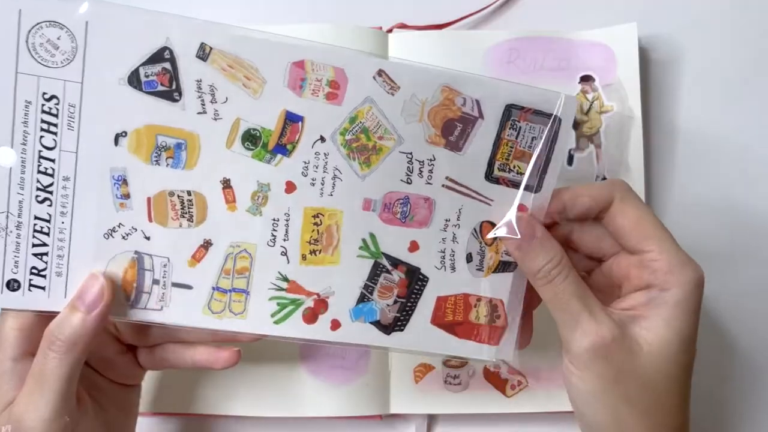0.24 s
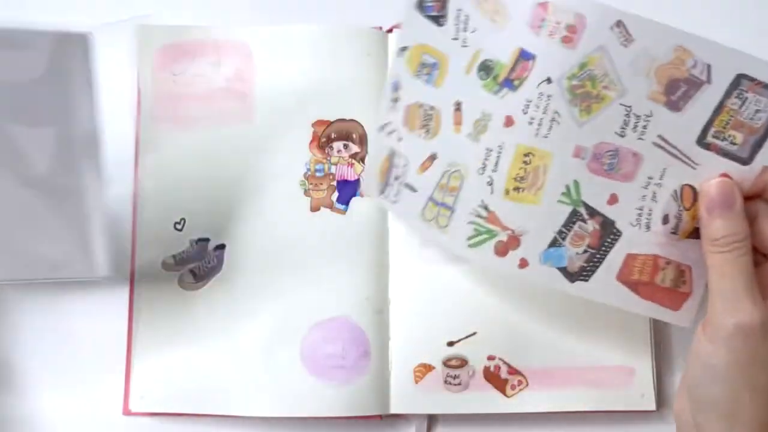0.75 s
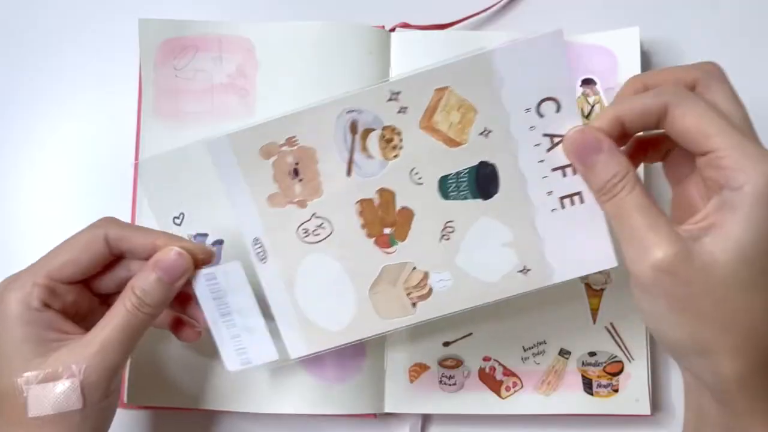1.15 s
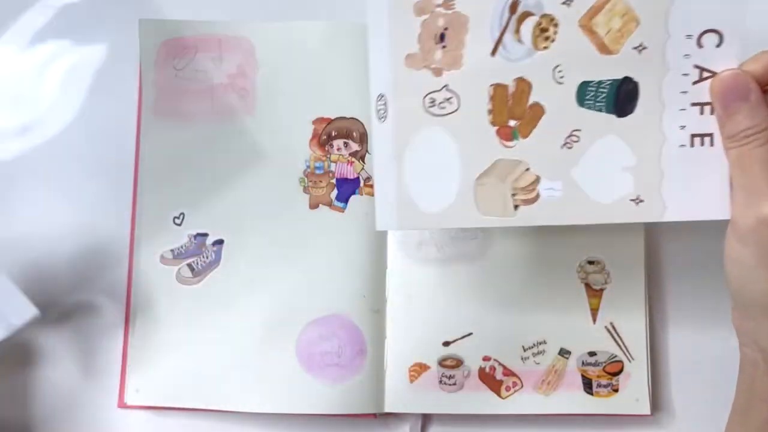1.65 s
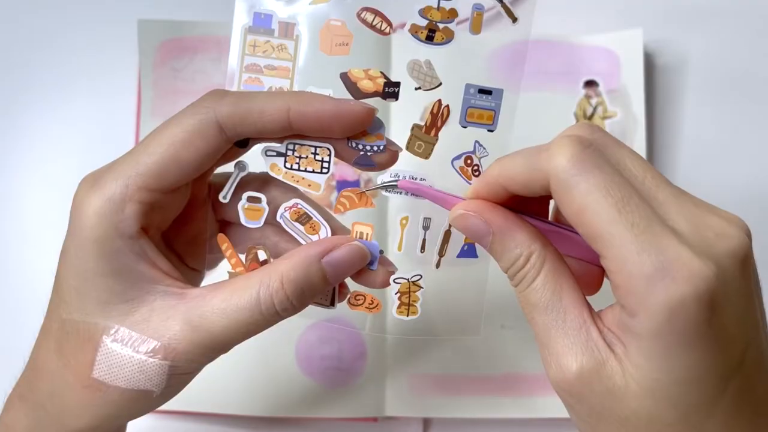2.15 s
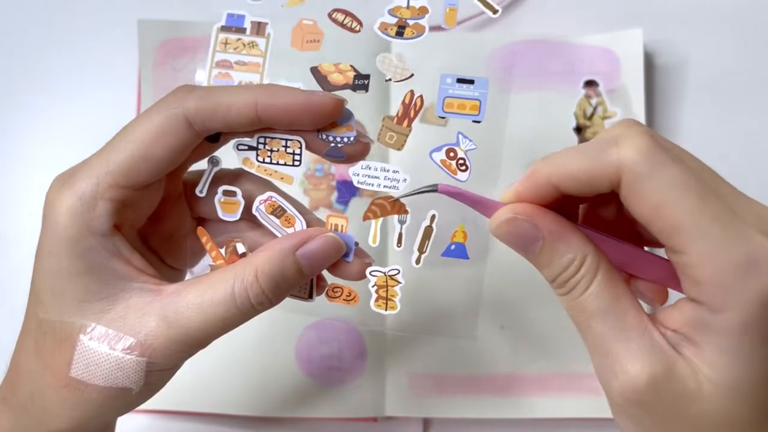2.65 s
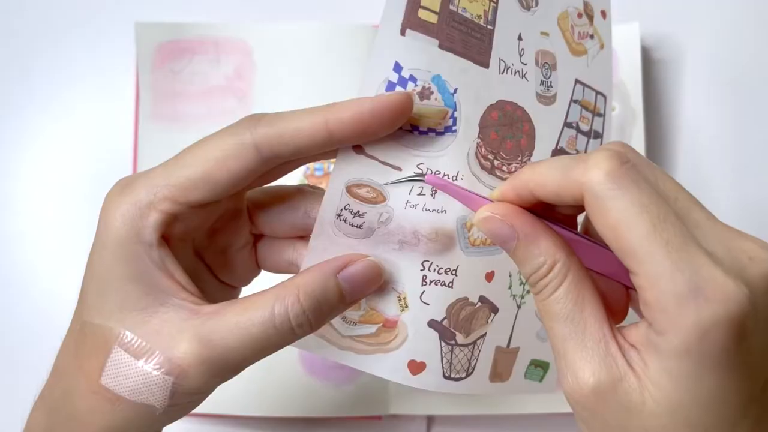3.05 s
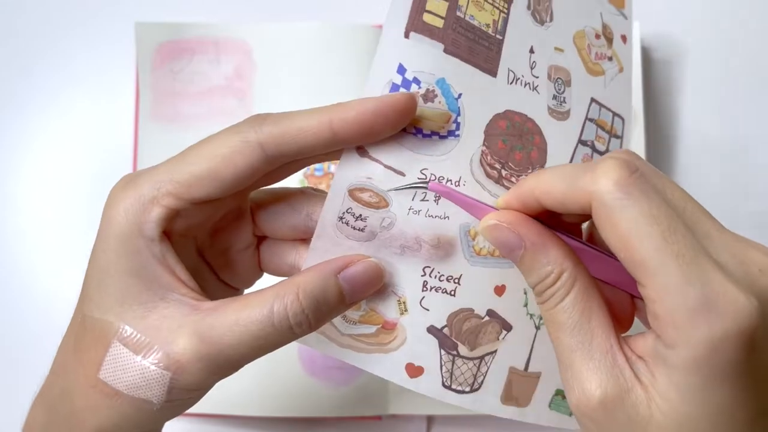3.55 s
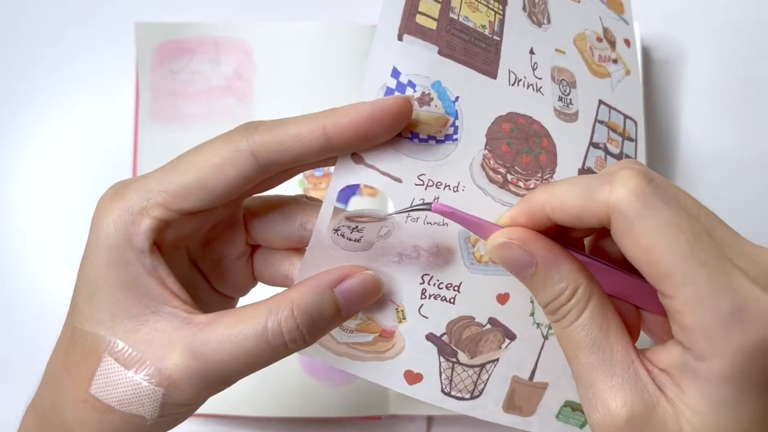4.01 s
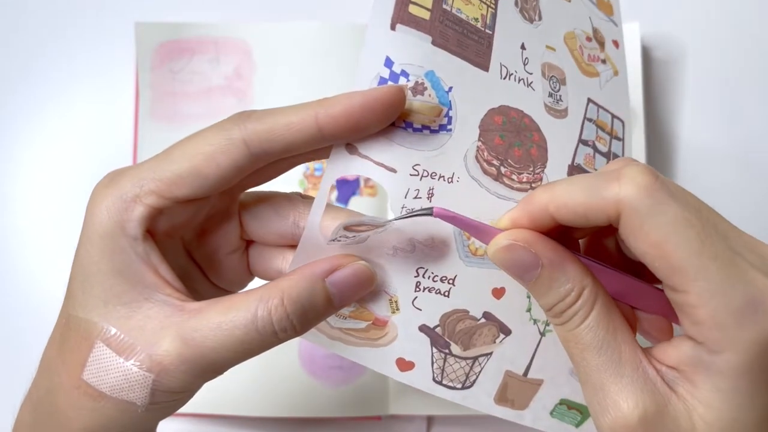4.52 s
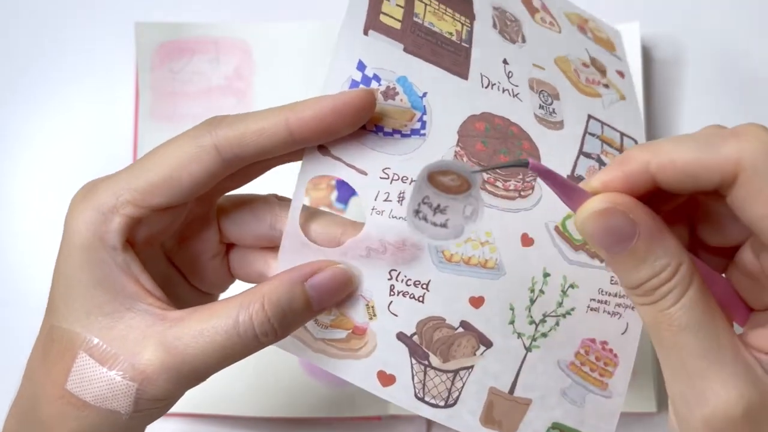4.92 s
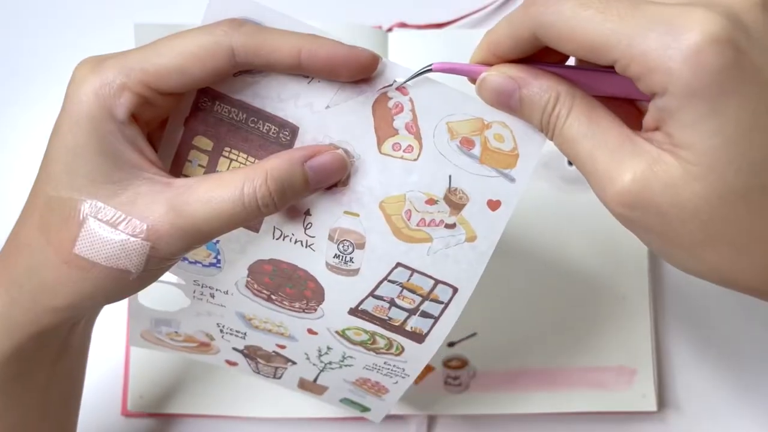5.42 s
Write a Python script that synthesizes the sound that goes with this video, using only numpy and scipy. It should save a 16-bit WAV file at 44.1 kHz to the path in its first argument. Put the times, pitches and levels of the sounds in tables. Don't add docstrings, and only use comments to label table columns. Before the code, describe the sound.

Close at a desk in a small room, thin plastic sleeves hiss and crackle as two printed sheets are pulled out in quick strokes. After about two seconds the handling becomes sparse: tweezers tug stickers from backing paper with isolated dry pops and faint peels. A low, wavering appliance hum runs beneath, shifting abruptly between takes. Close, bright stereo microphone with little room echo.

```python
import sys
import numpy as np
from scipy import signal
from scipy.fft import rfft, irfft
from scipy.io import wavfile
from scipy.ndimage import uniform_filter1d

SR = 44100
rng = np.random.default_rng(int(sys.argv[2]) if len(sys.argv) > 2 else 0)


def volts_from_decibels(level):
    exponent = np.asarray(level, float) / 20
    return 10 ** exponent


def waveform_to_disk(signal):
    frames = np.transpose(np.atleast_2d(signal))
    scaled = np.clip(frames, -1, 1) * 32767
    samples = np.round(scaled).astype(np.int16)
    wavfile.write(sys.argv[1], SR, samples)


N = 250047
TIME = np.arange(N) / SR
BINS_HZ = np.maximum(np.arange(N // 2 + 1) * SR / N, 1)


def rms_one(x):
    return x / np.sqrt(np.mean(x ** 2) + 1e-20)


def at_hz(points):
    hz, value = np.transpose(points)
    return np.interp(np.log(BINS_HZ), np.log(hz), value)


def colour(x, spectrum):
    return rms_one(irfft(rfft(x) * volts_from_decibels(at_hz(spectrum)), N))


def pair(mid, side, likeness):
    alike = np.clip(at_hz(likeness), 0, 1)
    m = rfft(mid, N) * np.sqrt(1 + alike)
    s = rfft(side, N) * np.sqrt(1 - alike)
    return irfft(np.array([m + s, m - s]), N) / np.sqrt(2)


def drift(rate_hz):
    r = np.exp(-2 * np.pi * rate_hz / SR)
    slow = signal.lfilter([1], [1, -2 * r, r * r], rng.standard_normal(N + SR))
    return rms_one(slow[SR:])


def resonate(x, modes, alternate=1):
    out = 0
    for k, (hz, width_hz, level_db) in enumerate(modes):
        r = np.exp(-np.pi * width_hz / SR)
        b = (1 - r * r) / 2 * np.array([1, 0, -1])
        a = [1, -2 * r * np.cos(2 * np.pi * hz / SR), r * r]
        sign = (-1) ** (k * alternate)
        out = out + volts_from_decibels(level_db) * sign * signal.lfilter(b, a, x)
    return out


def under(strokes):
    flap_db, flap_follows = -63, 0.51
    sparkle_db, sparkle_grows = -61, 1.4
    attack_s = 0.0091
    out = np.zeros((4, N))
    for start_s, end_s, first_db, last_db, body_rel_db in strokes:
        span = slice(round(start_s * SR), round(end_s * SR))
        hiss_db = np.interp(TIME[span], [start_s, end_s], [first_db, last_db])
        body_db = hiss_db + body_rel_db
        flap = flap_db + flap_follows * (body_db + 60)
        sparkle = sparkle_db + sparkle_grows * (hiss_db + 50)
        out[:, span] = volts_from_decibels(np.array([hiss_db, body_db, flap, sparkle]))
    keep = np.exp(-1 / (attack_s * SR))
    rising = signal.lfilter([2 * (1 - keep)], [1, -keep], out)
    return uniform_filter1d(np.minimum(out, rising), size=160)


# start_s, end_s, hiss_start_db, hiss_end_db, body_against_hiss_db
SLIDES = [(0.046, 0.12, -68.5, -55.5, -3.5), (0.12, 0.276, -55.5, -53.5, -3.5), (0.276, 0.34, -42, -43, -9),
          (0.34, 0.43, -43, -36.5, -13), (0.43, 0.53, -36, -39.5, -18), (0.53, 0.652, -38.5, -42.5, -14.5),
          (0.657, 0.762, -60, -74, -2.5), (0.767, 0.83, -58, -64.5, 3), (0.83, 0.912, -64.5, -59, 1),
          (0.914, 1.022, -72, -81.5, 6), (1.03, 1.089, -57.5, -46.5, -12.5),
          (1.089, 1.213, -44, -63.5, -14), (1.268, 1.472, -62, -50.5, -14),
          (1.472, 1.608, -51.5, -50.5, -8.5), (1.612, 1.7, -68.5, -83, -2), (1.73, 1.865, -60.5, -79, 3),
          (1.868, 1.879, -55.5, -60, 6.5), (1.879, 1.964, -41.5, -45.5, -15)]
# start_s, end_s, hiss_start_db, hiss_end_db, body_against_hiss_db
PEELS = [
    (2.36, 2.41, -81, -77, 5.5),
    (2.435, 2.444, -54.5, -64, 11.5),
    (3.556, 3.66, -62.5, -66, 1.5),
    (3.66, 3.755, -64.5, -64.5, 0.5),
    (3.755, 3.87, -74, -94.5, 5),
    (4.55, 4.572, -69, -71.5, -2),
    (4.98, 5.01, -68, -79.5, 9.5),
    (5.43, 5.53, -84, -85, 9),
    (5.53, 5.67, -86, -76.5, 9.5),
]
# start_s, length_s, flap_gain_db
LURCHES = [
    (0.219, 0.04, 9),
    (0.37, 0.044, 5.5),
    (0.583, 0.037, 10),
    (1.066, 0.03, 7),
    (1.55, 0.05, 3),
    (1.744, 0.037, 10.5),
    (3.654, 0.088, 7),
]
# frequency_hz, level_db (per Hz)
FILM_COLOUR = [(2500, -41.5), (4500, -7), (6300, -2.5), (8000, -3), (10000, -3), (12600, 6.5),
               (13800, -25.5), (16000, -34)]
SPARKLE_COLOUR = [(12000, -36.5), (13000, -2.5), (14000, -2.5), (15000, 9), (16500, -3.5)]
GLUE_COLOUR = [(2500, -42), (4500, -9), (6300, -1.5), (8300, -1.5), (10000, -8), (12000, -4), (13500, -31),
               (16000, -39.5)]
SHEET_COLOUR = [(900, -32.5), (1500, 2), (1950, -2.5), (2200, 0), (2480, -1.5), (3200, 2), (4500, -2.5),
                (7000, -26)]
FLAP_COLOUR = [(150, -14), (350, -3.5), (700, -6), (1200, -5.5), (2000, -51)]
# frequency_hz, likeness (0 to 1)
NEAR_LIKE = [(150, 0.92), (640, 0.33), (1400, 0.61), (3100, 0.65), (6000, 0.49), (8300, 1), (11000, 0.98),
             (16000, 0.97)]


def rubbing(grain_db=0.0, clump_db=-0.5, patch_db=1.5, ticks_per_s=140.0, tick_db=19.5, tick_spread_db=1.5):
    clumps = volts_from_decibels(clump_db * drift(110))
    grains = volts_from_decibels(grain_db * rng.exponential(1, (2, N)))
    catches = clumps * grains * rng.standard_normal((2, N))
    tick_level_db = tick_db + tick_spread_db * np.minimum(rng.exponential(1, N), 3)
    ticks = (rng.random(N) < ticks_per_s / SR) * volts_from_decibels(tick_level_db)
    both = pair(catches[0] + ticks, catches[1], NEAR_LIKE)

    film_hiss, film_body, film_flap, film_sparkle = under(SLIDES)
    glue_hiss, glue_body, glue_flap, _ = under(PEELS)
    hiss = film_hiss * colour(both, FILM_COLOUR) + glue_hiss * colour(both, GLUE_COLOUR)
    sheet = volts_from_decibels(2.5 * drift(25)) * colour(both, SHEET_COLOUR)
    body = film_body * (sheet + resonate(sheet, [(2130, 130, 1.3)]))
    body += glue_body * (sheet + resonate(sheet, [(2400, 91, 3)]))
    gust_db = 3.5 * drift(20)
    for start_s, length_s, gain_db in LURCHES:
        gust_db = gust_db + gain_db * np.exp(-((TIME - start_s) / length_s) ** 2)
    flap = (film_flap + glue_flap) * volts_from_decibels(gust_db) * colour(both, FLAP_COLOUR)
    sparkle = film_sparkle * colour(both, SPARKLE_COLOUR)
    return volts_from_decibels(patch_db * drift(30)) * hiss + body + flap + sparkle


# start_s, crack_peak_db, body_rel_db, thud_rel_db, pitch_hz
CREASES = [(0.0741, -17.5, -11.5, -30.5, 5700), (0.1199, -4, -22.5, -33.5, 5200),
           (0.156, -27, -7, -17, 6100), (0.2458, -43.5, -5.5, -9, 2070), (0.3535, -34, -3, -22, 2140),
           (0.3744, -29, -9, -16, 1200), (1.054, -42.5, -1, 1, 2170), (0.6, -24.5, -19, -18, 2180),
           (0.6213, -15, -24, -21, 2020), (0.6444, -29, -7, -21.5, 1190), (0.7161, -38.5, -12.5, -14, 2500),
           (0.7651, -25.5, -18, -20, 4250), (0.7853, -35, -6.5, 2.5, 1290),
           (0.8118, -13.5, -14.5, -34.5, 4920), (0.8657, -36, -6.5, -20, 5600),
           (0.9033, -47, 5.5, -19, 4920), (0.9414, -55.5, 7, 3, 3550), (1.0298, -28.5, -41, -36, 1270),
           (1.0677, -33, -5, -1.5, 1120), (1.0837, -26, -16, -15, 5960), (1.0984, -18, -14.5, -40, 5800),
           (1.6054, -42, -3, -6, 1210), (1.7071, -40.5, 4.5, -1.5, 2140), (1.714, -19.5, -21, -39, 2210)]
# start_s,
# crack_peak_db, body_rel_db, thud_rel_db, pitch_hz
POPS = [(2.3802, -45.5, -5, -13, 4270), (2.394, -49, 5, -9, 1920), (2.4316, -41, 8, 5.5, 2620),
        (2.4487, -14, -5.5, -10, 2470), (2.8963, -51, -2, 1.5, 1104), (3.4058, -34.5, 3.5, -6.5, 1046),
        (3.5585, -31, -25.5, -18, 1450), (3.5624, -26.5, -20.5, -29, 1500), (3.5714, -37, -25, -26, 1790),
        (4.031, -58.5, -10, 10, 1133), (4.1728, -45, 8, 5.5, 2170), (4.2233, -40, -12, -28.5, 3000),
        (4.2339, -48, -15, -20, 3000), (4.4203, -57, -6, 0.5, 1275), (4.537, -43.5, -19, -25, 4000),
        (4.553, -40.5, -16.5, -21, 4000), (4.5731, -33.5, -5.5, -12.5, 1480),
        (4.5823, -21.5, 3.5, -5.5, 2270), (4.608, -36, 9, 8.5, 3650), (4.9768, -42.5, -1.5, 9.5, 1440)]
# start_s, crack_peak_db
THREADS = [(3.6234, -56), (3.715, -37), (3.7277, -34), (3.74, -36.5), (3.7474, -35.5), (3.784, -46.5),
           (5.437, -52.5), (5.456, -52.5), (5.4722, -54.5), (5.4794, -45.5), (5.4906, -56.5), (5.507, -55),
           (5.5143, -40.5), (5.5374, -53), (5.581, -57), (5.6098, -55.5), (5.6214, -49), (5.637, -57),
           (5.6513, -50)]


def all_snaps():
    threads = []
    for start_s, peak_db in THREADS:
        pitch_hz = 2400 if start_s < 5.01 else 2900
        threads.append((start_s, peak_db, -6.5, -19, pitch_hz))
    out = []
    for rows, t60_s in ((CREASES, 0.015), (POPS, 0.015), (threads, 0.014)):
        for start_s, peak_db, body_db, thud_db, pitch_hz in rows:
            ring_s = t60_s * (1.5 + 0.0446 * (peak_db + 29.5))
            out.append((start_s, peak_db, body_db, thud_db, ring_s, pitch_hz))
    return out


# frequency_hz, width_hz, level_db
SHEET_MODES = [(2470, 2400, 0.17)]
BACKING_THUD_MODES = [(111.1, 79, 13), (237, 55, 19.5), (380.6, 112, 21), (650, 440, 13.5),
                      (1120, 890, 6.5)]
FILM_THUD_MODES = [(295, 170, 12), (576, 300, 15), (1000, 540, 10)]


def snaps(ragged_share, crack_db=0, body_db=14, thud_db=12, lead=5.46, run_up_s=0.0011, spread=0.14,
          crack_share=1.7, width_hz=500, main_db=8, top_hz=11000, dulling=0.6):
    events = all_snaps()
    length = 3000
    age = np.arange(length) / SR - run_up_s
    run_up = np.clip(1 + age / run_up_s, 0, 1)
    ragged = ragged_share * rng.standard_normal((len(events), 2, length))
    crack, body, thud = np.zeros((3, 2, N + length))
    for (start_s, peak_db, body_rel_db, thud_rel_db, t60_s, pitch_hz), (a, b) in zip(events, ragged):
        fall = volts_from_decibels(-60 * np.maximum(age, 0) / np.clip(t60_s, .004, .1))
        burst = fall * run_up * np.array([a + spread * b, a - spread * b])
        burst[:, np.argmax(age >= 0)] = lead
        burst = volts_from_decibels(peak_db) * burst / lead
        edge_hz = np.clip(top_hz * volts_from_decibels(-dulling * body_rel_db), 6000, 20000)
        dull = signal.butter(2, edge_hz, fs=SR)
        body_modes = [(pitch_hz, width_hz, main_db)] + SHEET_MODES
        thud_modes = FILM_THUD_MODES if start_s < POPS[0][0] - .1 else BACKING_THUD_MODES
        first = round(start_s * SR)
        span = slice(first, first + length)
        crack[:, span] += volts_from_decibels(crack_db) * signal.lfilter(*dull, burst * fall ** crack_share)
        body[:, span] += volts_from_decibels(body_rel_db + body_db) * resonate(burst, body_modes, alternate=0)
        thud[:, span] += volts_from_decibels(thud_rel_db + thud_db) * resonate(burst, thud_modes)
    body = signal.sosfilt(signal.butter(6, 12600.0, fs=SR, output="sos"), body)
    crack = signal.sosfilt(signal.butter(2, 4500.0, "high", fs=SR, output="sos"), crack)
    return (crack + body + thud)[:, :N]


# frequency_hz, likeness (0 to 1)
FAR_LIKE = [(60, 0.99), (130, 0.87), (290, 0.27), (640, .15), (1400, 0.089), (3100, 0.42), (6800, 0.53),
            (9600, 1), (11000, 1), (16000, 0.83)]
# frequency_hz, level_db
ROOM_COLOUR = [(200, -12.5), (1000, -8), (2500, -10.5), (5000, -6.5), (10000, -13), (16000, -11.5)]


def room(x, gap_s=0.0022):
    t60_s, level_db, gate_s = 0.41, -8, 0.222
    build_up = 1 - np.exp(-TIME / gap_s)
    gate = np.clip((gate_s - TIME) / .04, 0, 1)
    tail = volts_from_decibels(-60 * TIME / t60_s) * build_up * gate
    echo = colour(pair(*rng.standard_normal((2, N)), FAR_LIKE), ROOM_COLOUR) * tail
    echo = echo[:, :SR // 2] / np.sqrt(np.sum(tail ** 2))
    mono = x.mean(axis=0, keepdims=True)
    return volts_from_decibels(level_db) * signal.fftconvolve(mono, echo, axes=1)[:, :N]


# start_s, beat_null_s, skipped_turns, rattle_db
TAKES = [
    (0, 0.326, 0.0, -53.5),
    (1.025, 1.497, -0.4, -54),
    (1.96, 2.242, -0.27, -58),
    (2.897, 3.325, -0.75, -49),
    (3.997, 4.271, -0.6, -54),
    (5.025, 5.124, -0.45, -43.5),
]
# time_s, level_db
DRONE = [(0.0, -44.5), (0.06, -40.5), (0.65, -40.5), (1.56, -46.5), (1.74, -40.5), (2.42, -47.5),
         (2.65, -41), (3.05, -47.5), (3.16, -37), (3.32, -49), (3.41, -42), (3.87, -41.5), (3.98, -48.5),
         (4.09, -38.5), (4.26, -50.5), (4.37, -42.5), (5.61, -39), (5.67, -40)]
# frequency_hz, level_db
HUM = [(78, -65), (155, -65.5), (249, -64.5)]


def appliance(wander_hz=.3, flutter_db=3.0, rattle_swing_db=0.5):
    start_s, null_s, skipped, rattle_db = np.transpose(TAKES)
    take = np.maximum(np.searchsorted(start_s, TIME) - 1, 0)
    phase = 2 * np.pi * np.cumsum(48.74 + wander_hz * drift(2.7)) / SR
    skip = 2 * np.pi * skipped[take]
    drone = uniform_filter1d(np.cos(skip), size=2000) * np.sin(phase)
    drone += uniform_filter1d(np.sin(skip), size=2000) * np.cos(phase)
    out = volts_from_decibels(np.interp(TIME, *np.transpose(DRONE))) * drone
    mains = 2 * np.pi * 198.4 * TIME
    behind = 2 * np.pi * 2.27 * (TIME - null_s[take])
    out += volts_from_decibels(-57.5) * (np.sin(mains) - volts_from_decibels(-1.5) * np.sin(mains - behind))
    for hz, line_db in HUM:
        out = out + volts_from_decibels(line_db + flutter_db * drift(2.0)) * np.sin(2 * np.pi * hz * TIME)
    rattle_mode = [(127.6, 17, 0)]   # Hz, width Hz, dB
    panel = rms_one(resonate(resonate(rng.standard_normal(N), rattle_mode), rattle_mode))
    panel_db = uniform_filter1d(rattle_db[take], size=900) - 4.0 + rattle_swing_db * drift(0.5)
    return np.sqrt(2) * out + volts_from_decibels(panel_db) * panel


# frequency_hz, level_db (per Hz)
RUMBLE_COLOUR = [(22, -40.5), (34, -14.5), (55, -6.5), (80, -13), (130, -13.5), (220, -20.5), (435, -26),
                 (800, -33.5), (1350, -43), (2300, -52), (4500, -66.5), (9000, -77.5), (12000, -106)]
HISS_COLOUR = [(2000, -5.5), (5000, -2), (9000, -10), (12000, -8.5), (14000, -11.5), (16000, -18)]


def air():
    rumble = pair(*rng.standard_normal((2, N)), FAR_LIKE)
    hiss = pair(*rng.standard_normal((2, N)), FAR_LIKE)
    return volts_from_decibels(-51.5) * colour(rumble, RUMBLE_COLOUR) + volts_from_decibels(-84.5) * colour(hiss, HISS_COLOUR)


def scene():
    releases = snaps(ragged_share=0, width_hz=440, main_db=2.0)
    return rubbing() + snaps(ragged_share=0.89) + room(releases) + appliance() + air()


# frequency_hz, level_db
PORT = [(5000, 0.5), (8500, 6), (10700, 12.5), (12000, 1), (13200, -21.5), (15000, -7), (16000, -8.5),
        (16600, -31)]
# frequency_hz, left_lead (half turns)
PORT_LEAD = [(100, 0), (2400, -.15), (5400, -.2), (7750, -.4), (8600, 0), (10300, 1), (12000, 2),
             (13300, 3), (15000, 4), (17000, 5)]
# frequency_hz, balance_db
PORT_BALANCE = [(60, 1), (110, -3.5), (200, 2), (380, -1), (700, -1.5), (1290, -2.5), (2380, -3.5),
                (4400, -3), (8120, -1), (15000, 1)]


def microphone_ports(x):
    hz, lead = np.transpose(PORT_LEAD)
    turn = np.exp(.5j * np.pi * np.interp(BINS_HZ, hz, lead))
    half = volts_from_decibels(at_hz(PORT_BALANCE) / 2) * turn
    return irfft(rfft(x) * volts_from_decibels(at_hz(PORT)) * np.array([half, 1 / half]), N)


# low_hz, high_hz, threshold_db
TREBLE_GATE = [(12900, 14300, -68), (14300, 17000, -79)]


def treble_gate(x):
    for low_hz, high_hz, keep_db in TREBLE_GATE:
        band = irfft(rfft(x) * ((BINS_HZ >= low_hz) & (BINS_HZ < high_hz)), N)
        power = uniform_filter1d(np.mean(band ** 2, axis=0), size=512)
        shut = uniform_filter1d((power < volts_from_decibels(2 * keep_db)) * 1., size=256)
        x = x - shut * band
    return x


def top_cut(x):
    return signal.sosfilt(signal.butter(12, 16740, fs=SR, output="sos"), x)


def record(dry):
    mix = treble_gate(microphone_ports(dry))
    return top_cut(mix)


dry = scene()
out = record(dry)
waveform_to_disk(out)
```